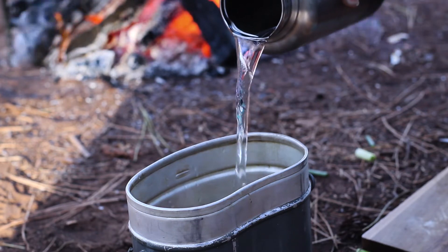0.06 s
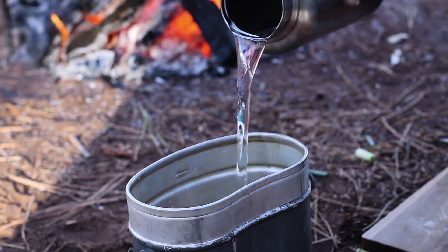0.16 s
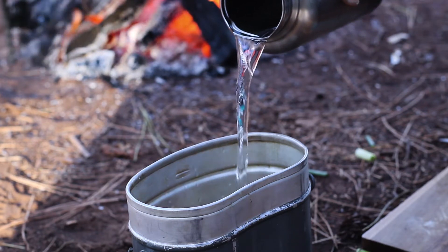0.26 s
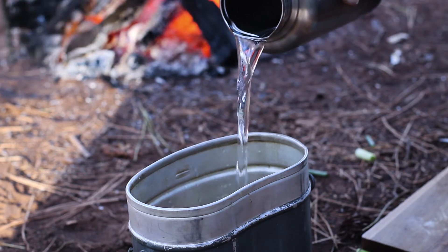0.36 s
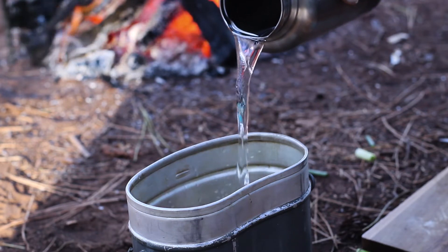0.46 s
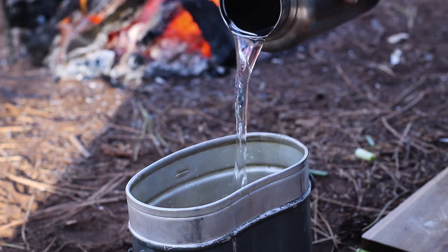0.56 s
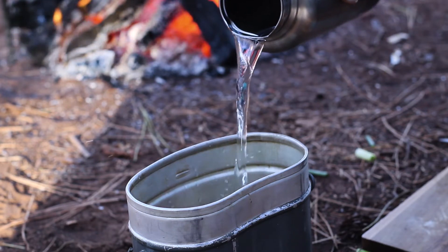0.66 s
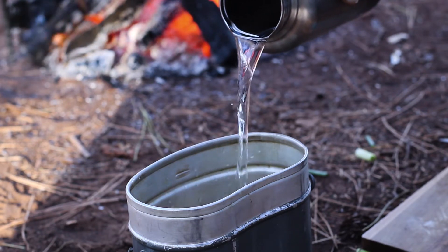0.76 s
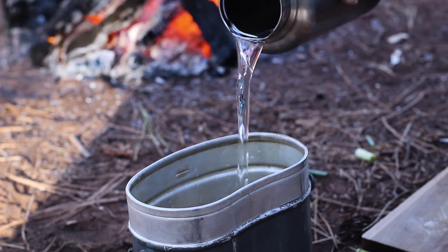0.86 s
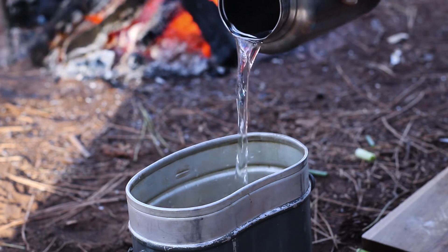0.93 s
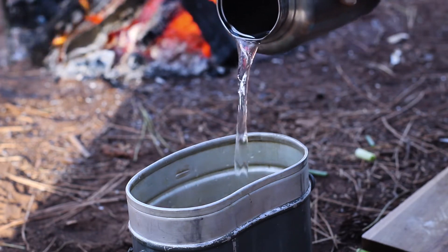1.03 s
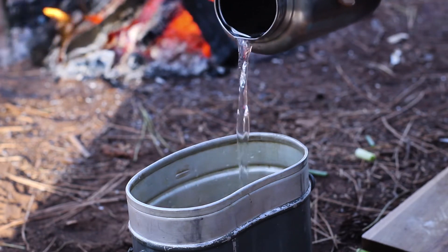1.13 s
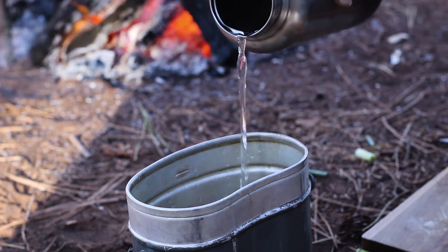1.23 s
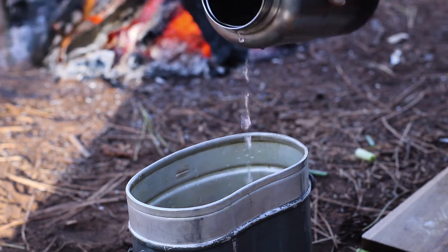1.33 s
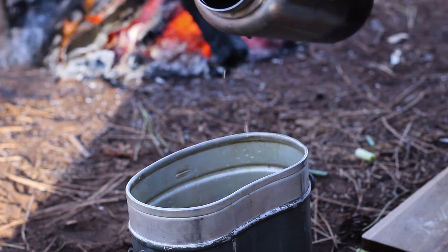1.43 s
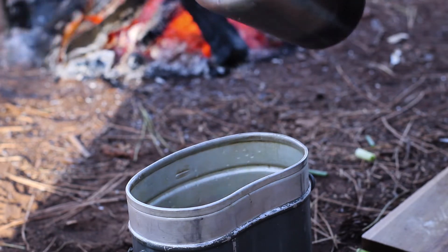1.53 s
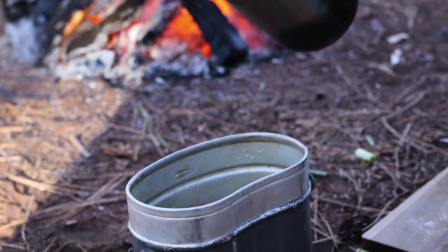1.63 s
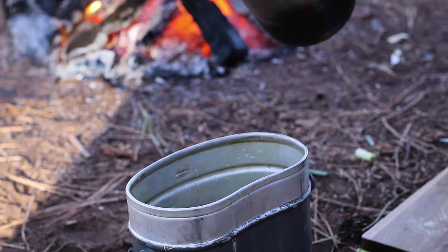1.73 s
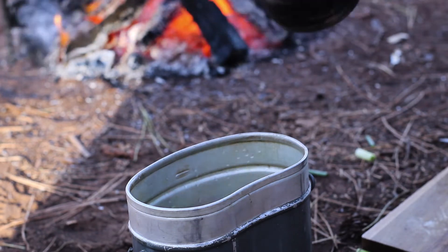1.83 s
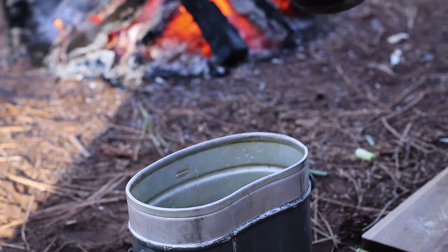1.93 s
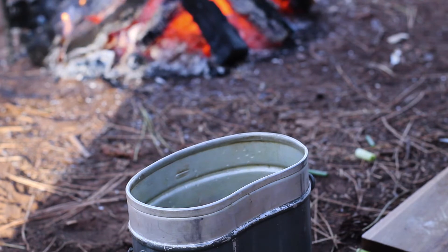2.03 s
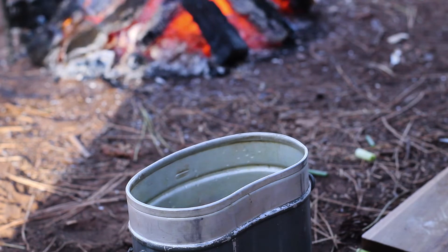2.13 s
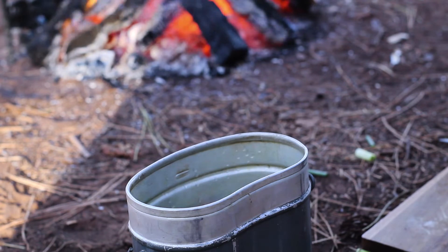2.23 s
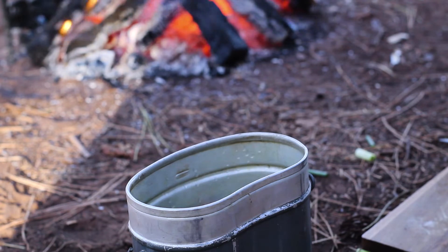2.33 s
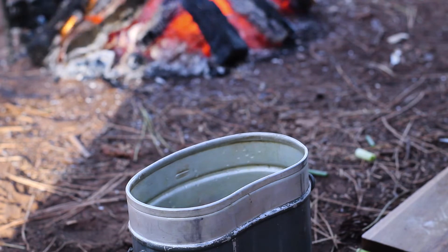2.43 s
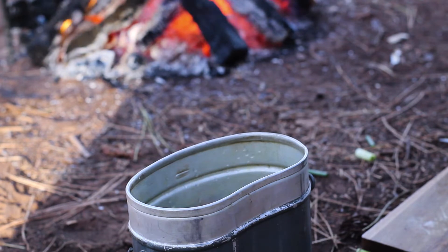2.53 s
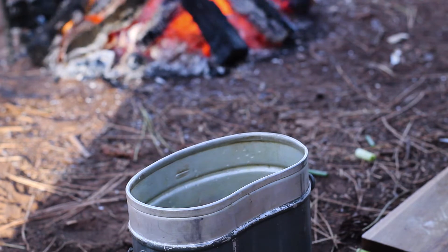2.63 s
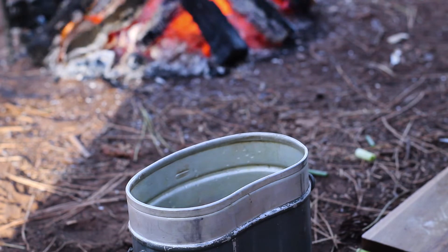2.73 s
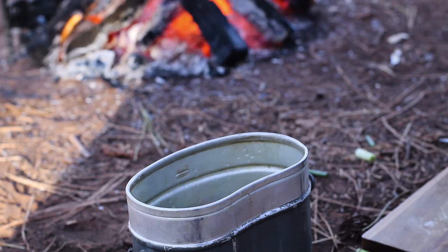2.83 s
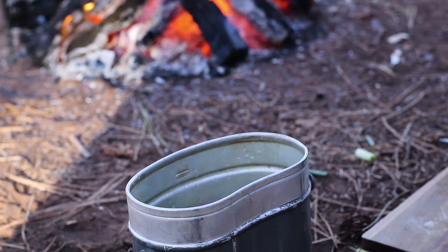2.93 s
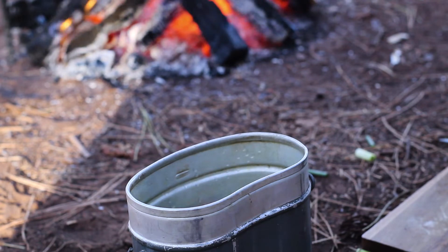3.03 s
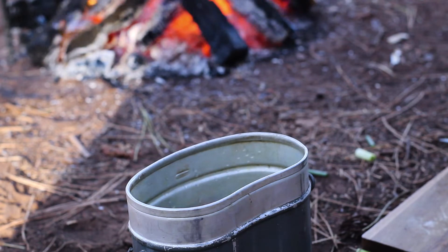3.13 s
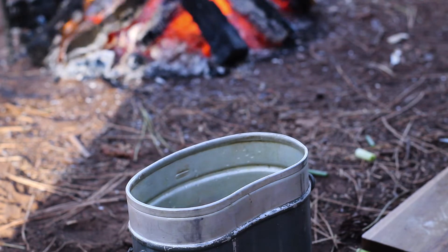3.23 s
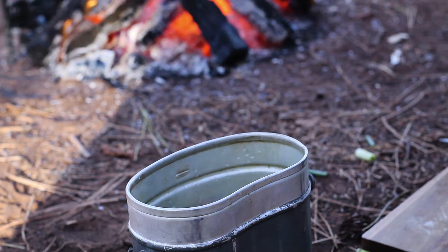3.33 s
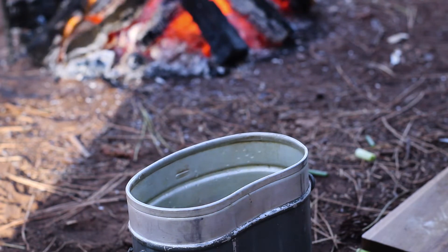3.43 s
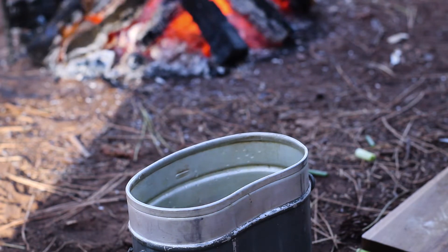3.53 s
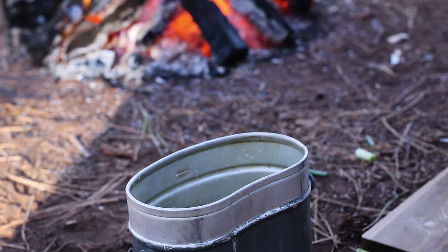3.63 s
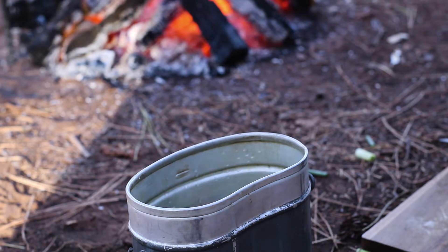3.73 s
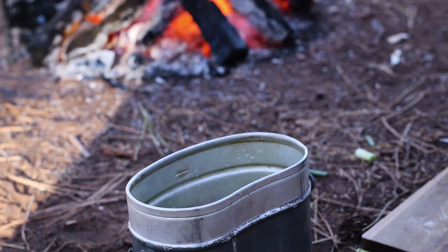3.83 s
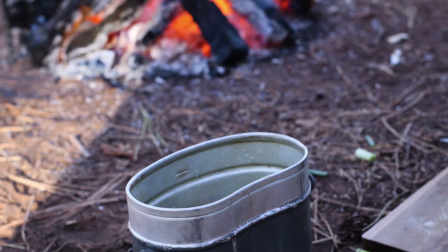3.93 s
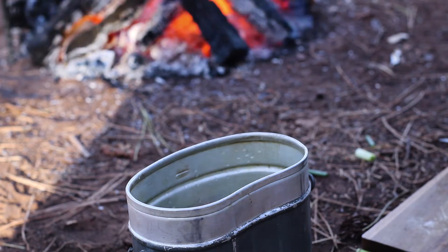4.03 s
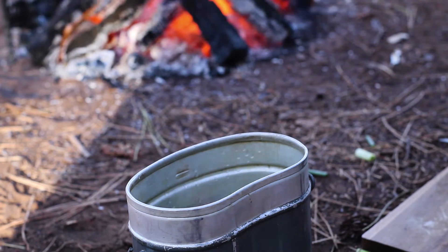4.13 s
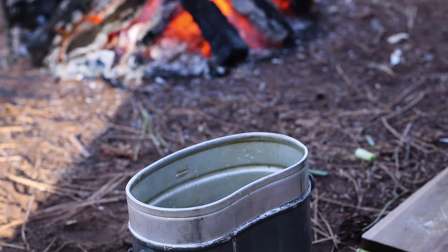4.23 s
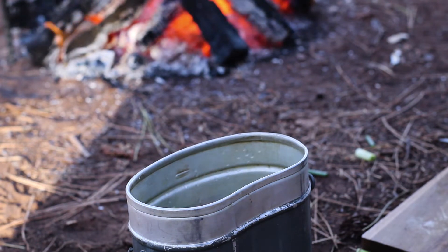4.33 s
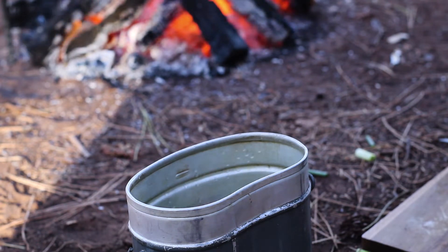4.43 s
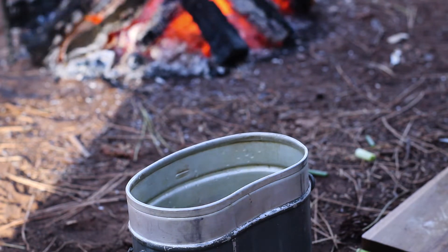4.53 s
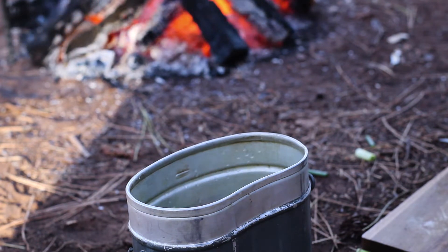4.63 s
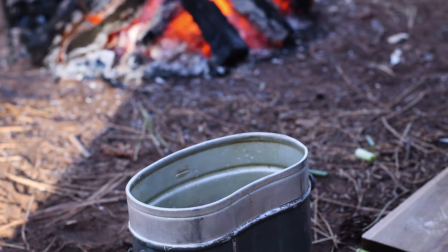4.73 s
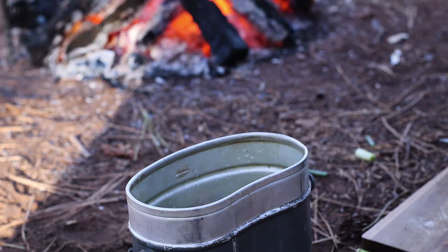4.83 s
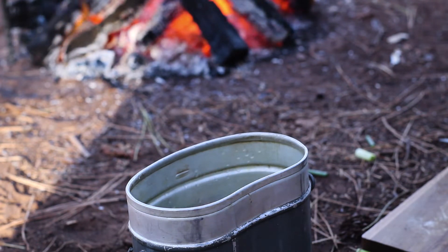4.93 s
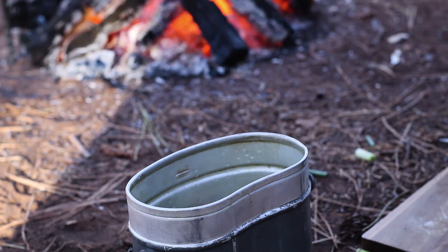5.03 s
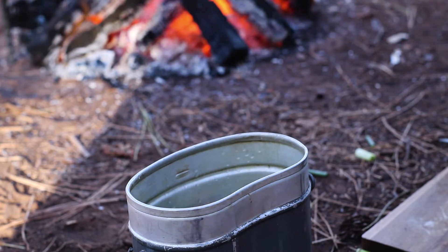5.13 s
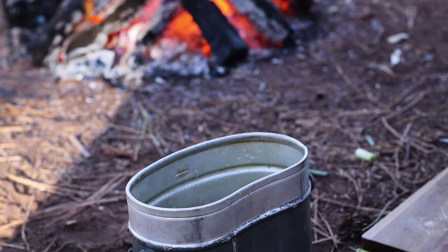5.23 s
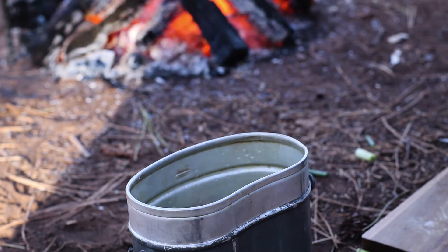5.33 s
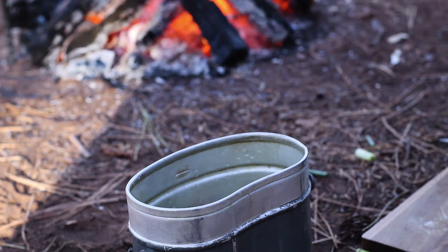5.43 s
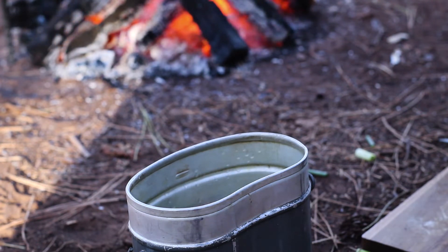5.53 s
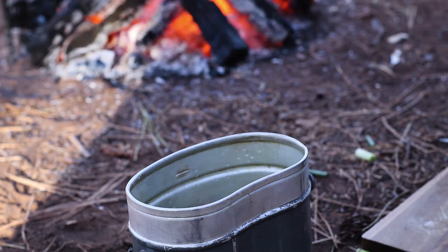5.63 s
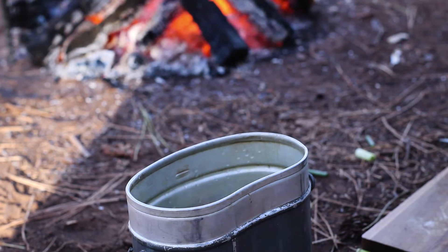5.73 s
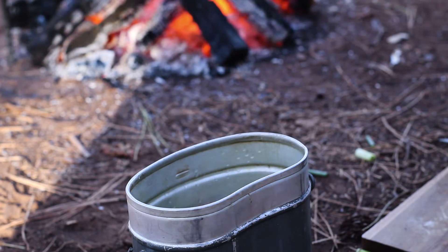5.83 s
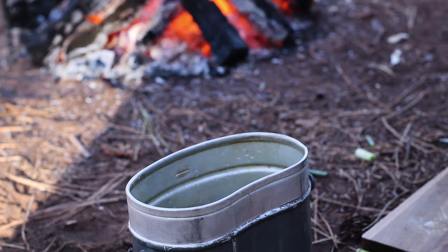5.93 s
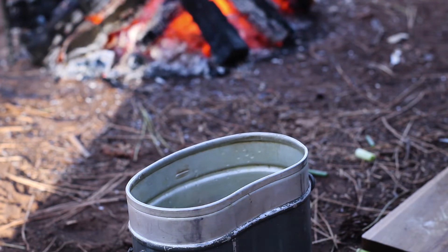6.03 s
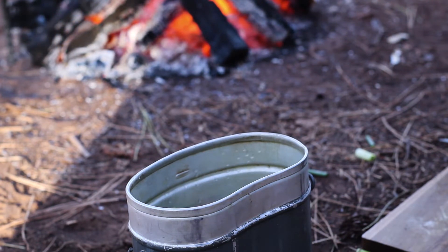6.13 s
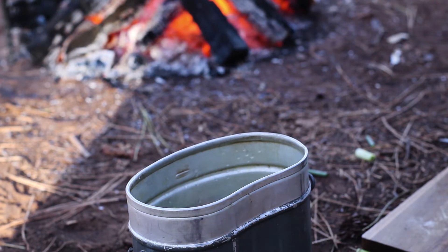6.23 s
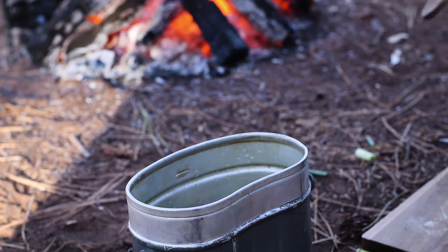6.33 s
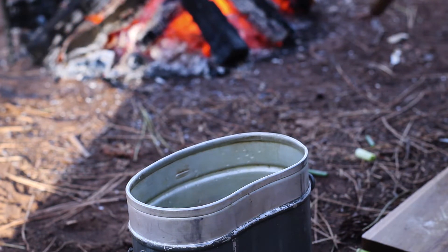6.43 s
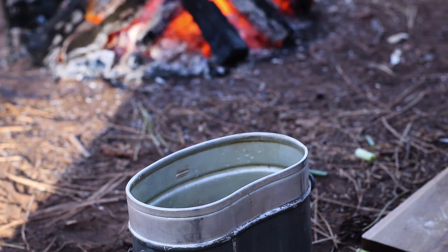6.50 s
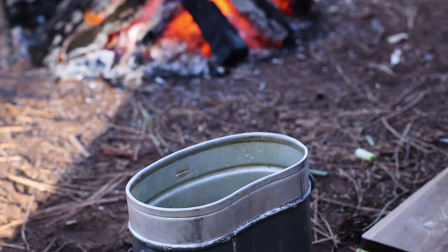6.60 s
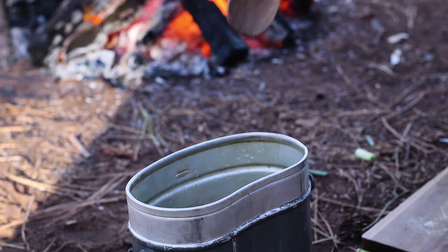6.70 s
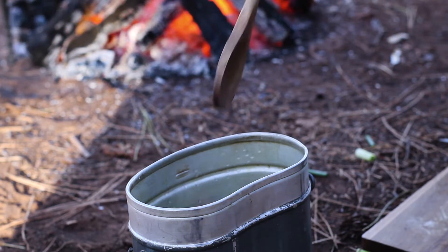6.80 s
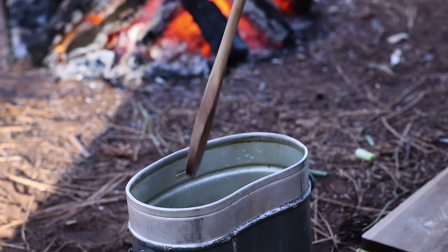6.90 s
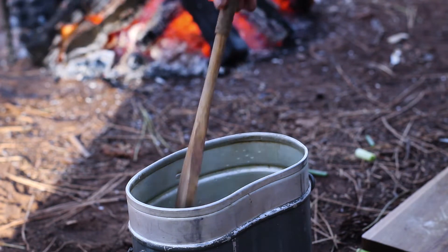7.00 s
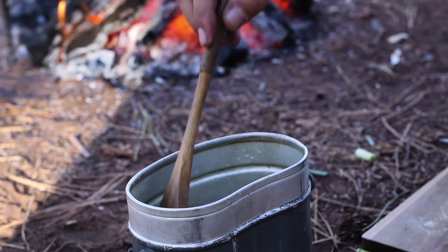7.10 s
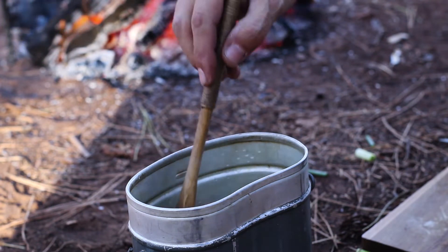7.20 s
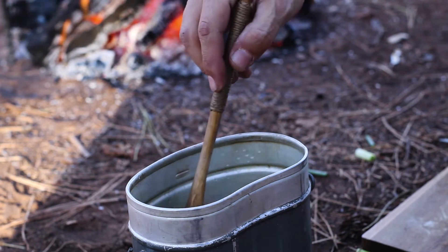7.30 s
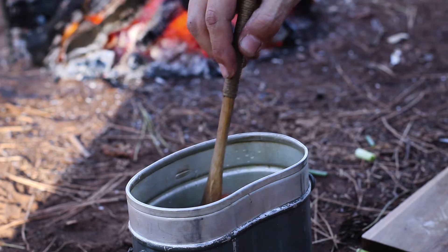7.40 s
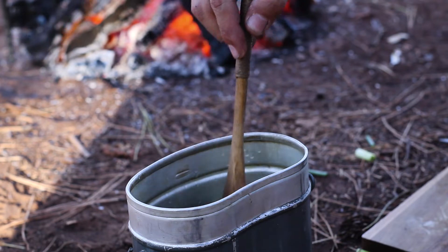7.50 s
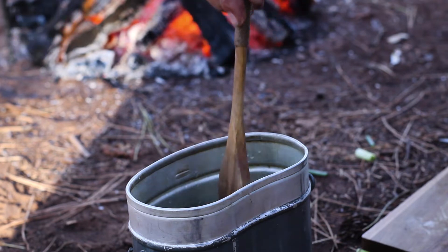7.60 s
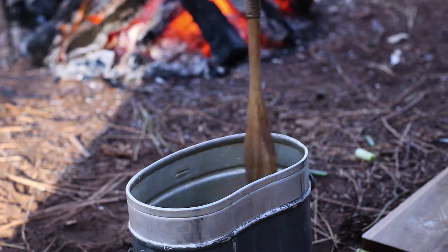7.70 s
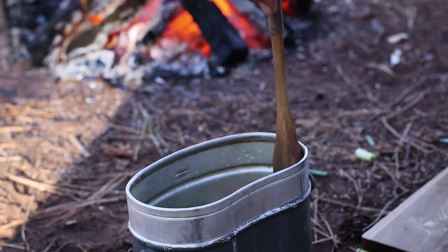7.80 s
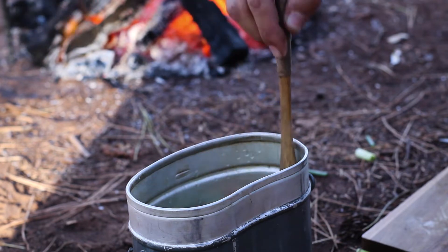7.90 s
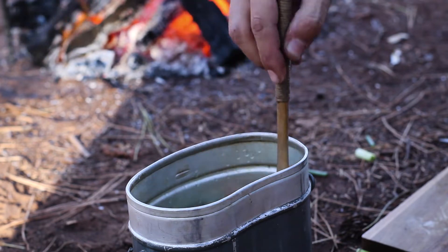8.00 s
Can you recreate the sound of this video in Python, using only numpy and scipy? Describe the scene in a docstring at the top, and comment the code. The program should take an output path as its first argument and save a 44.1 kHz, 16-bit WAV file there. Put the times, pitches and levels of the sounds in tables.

```python
"""Beside a campfire, a pour from a steel bottle into a metal cup ends, the stream breaking into drops.
The bottle is capped and put down with hollow knocks and a squeak; a wooden spoon strikes and scrapes the cup.
Struck metal is sums of decaying modes; stream and scrapes are random grains driving resonators.
The fire is flickering bands of hiss with noise-burst ticks; drops are bursts, bubbles rising sines,
and the faint chirps and whine are narrow bands of noise."""
import sys
import numpy as np
from scipy import signal
from scipy.io import wavfile

SR = 44100
rng = np.random.default_rng(int(sys.argv[2]) if len(sys.argv) > 2 else 0)


def wav_record(signal):
    """Record a signal, one row per channel, as 16-bit PCM in the file named by sys.argv[1]."""
    frames = np.transpose(np.atleast_2d(signal))
    bounded = np.clip(frames, -1, 1)
    # unit amplitude maps onto the largest positive 16-bit level
    quanta = np.round(bounded * 32767).astype(np.int16)
    wavfile.write(sys.argv[1], SR, quanta)


N = 355446


def amp(db):
    """Decibels to a linear gain."""
    return 10 ** (np.asarray(db) / 20)


def rms_one(x):
    """Scales a sound to an rms of 1."""
    return x / np.sqrt(np.mean(x ** 2) + 1e-20)


def drift(rate_hz):
    """Slow random wander with spread 1: noise smoothed by two poles at a reduced sample rate."""
    r = np.exp(-80 * np.pi * rate_hz / SR)
    noise = rng.standard_normal(N // 40 + 2002)
    slow = signal.lfilter([1], [1, -2 * r, r * r], noise)[2000:]   # skips the filter's build-up
    return np.interp(np.arange(N) / 40, np.arange(len(slow)), rms_one(slow))


def ring(clicks, hz, t60_s):
    """A resonator: a unit click sets a decaying sine of height 1 ringing."""
    r, w = amp(-60 / (t60_s * SR)), 2 * np.pi * hz / SR
    return signal.lfilter([0, np.sin(w)], [1, -2 * r * np.cos(w), r * r], clicks + 1e-18)


def grains(per_s, spread_db):
    """Random clicks of very uneven size and either sign."""
    sizes = amp(spread_db * np.minimum(rng.exponential(1, N), 4)) * rng.choice([-1, 1], N)
    return sizes * (rng.random(N) < per_s / SR)


def band(x, low_hz, high_hz):
    """Band-pass filter."""
    return signal.sosfilt(signal.butter(2, [low_hz, min(high_hz, .45 * SR)], "band", fs=SR, output="sos"), x)


def add(out, s, sound):
    """Mixes a short sound in at time s."""
    i = round(s * SR)
    out[i:i + len(sound)] += sound[:N - i]


def decay(t60_s, size):
    """An exponential fade, 60 dB down after t60_s."""
    return amp(-60 * np.arange(size) / SR / t60_s)


def sine(hz, size):
    """A steady sine starting at zero."""
    return np.sin(2 * np.pi * hz * np.arange(size) / SR)


def snap(hz, breadth, t60_s, tail_db, tail_t60_s):
    """A burst of noise around hz that builds for a millisecond, then fades in two slopes; peak 1."""
    fade = decay(t60_s, size=1500) + amp(tail_db) * decay(tail_t60_s, size=1500)
    shape = np.append(np.geomspace(.02, 1, 50), fade)
    wide = 1 + np.clip(breadth, .03, 3)
    burst = band(rng.standard_normal(len(shape)) * shape, hz / wide, hz * wide)
    return burst / np.abs(burst).max()


def gliding(drive, hz, width_hz):
    """Drive limited to width_hz and carried on a moving centre; rms 1."""
    turn = np.exp(2j * np.pi * np.cumsum(hz) / SR)
    low_pass = signal.butter(2, width_hz / 2, fs=SR, output="sos")
    slow = signal.sosfilt(low_pass, drive * np.conj(turn))
    return rms_one(np.real(slow * turn))


def strokes(rows, attack_s, sag_db, release_s):
    """Gain of strokes that rise, sag and stop, and their further columns held until the next stroke."""
    t, rows = np.arange(N) / SR, np.array(rows)
    current = np.maximum(np.searchsorted(rows[:, 0], t) - 1, 0)
    s, length, db, *rest = rows[current].T
    edges = np.clip(np.minimum((t - s) / attack_s, (s + length - t) / release_s), 0, 1)
    return [edges * amp(db + sag_db * np.clip((t - s) / length, 0, 1)), *rest]


# Faint far chirps: start_s, level_db, length_s
CHIRPS = [(3.6, -66, .03), (3.64, -64, .05), (3.78, -64, .04), (3.865, -60, .045), (4.01, -63, .027),
          (4.105, -64, 0.029), (4.181, -64, .02)]
CHIRP_HZ = 5240
WHINE_HZ, WHINE_WIDTH_HZ, WHINE_DB = 13300, 300, -82


def insects():
    """Narrow bands of noise: short rough chirps over a thin wavering whine."""
    air = rng.standard_normal(N)
    out = amp(WHINE_DB + 3.9 * drift(7.4)) * gliding(air, np.full(N, WHINE_HZ), WHINE_WIDTH_HZ)
    tone = gliding(air, np.full(N, CHIRP_HZ), 120)
    for s, db, length in CHIRPS:
        i, size = round(s * SR), round(length * SR)
        out[i:i + size] += amp(db) * np.hanning(size) ** .5 * tone[i:i + size]
    return out


# Tone colour of the fire's hiss: pitch_hz, level_db (relative, per Hz)
HISS = [(12, -40), (20, -14.5), (74, 3), (177, -1.5), (328, 0), (513, -4.5), (1610, -9.5), (5530, -17),
        (10500, -19.5), (13900, -23), (16000, -59)]
# The loudest ticks of the fire: start_s, peak_db, centre_hz, breadth (share of the centre)
TICKS = [(1.516, -37, 10400, 0.45), (1.5284, -37.5, 10700, 0.51), (1.5698, -37, 8940, 0.45),
         (1.73, -40, 6370, 0.4), (2.2273, -38, 4930, 0.45), (2.3527, -36.5, 9740, 0.45),
         (2.5526, -37.5, 9480, 0.45), (2.5795, -41, 8420, 0.45), (2.6334, -39, 11600, 0.45),
         (2.7516, -36, 9220, 0.45), (2.8155, -33.5, 10500, 0.49), (3.5294, -29, 9600, 0.56),
         (3.8422, -31, 9870, 0.37), (3.864, -36.5, 5250, 0.52), (4.1644, -40, 11500, 0.45),
         (4.1774, -39, 5190, 0.45), (4.2244, -35, 11400, 0.45), (4.3323, -39, 4840, 0.49),
         (4.4064, -34, 5010, 0.45), (4.4137, -31, 4500, 0.45), (4.5575, -40, 9030, 0.45),
         (4.6544, -31, 8980, 0.55), (4.7336, -39, 7470, 0.45), (4.9264, -32.5, 8240, 0.45),
         (5.013, -38.5, 7880, 0.35), (5.1018, -34.5, 8200, 0.36), (5.2897, -35.5, 4670, 0.49),
         (5.4066, -25.5, 10600, 0.42), (5.4864, -39.5, 8880, 0.45), (5.5516, -39, 9150, 0.45),
         (5.885, -23, 10400, 0.49), (5.9708, -38, 9410, 0.45), (6.221, -28.5, 10700, 0.45),
         (6.4445, -35.5, 10900, 0.49), (6.6313, -32, 4730, 0.58), (6.9416, -34.5, 6800, 0.59),
         (7.3296, -36, 8400, 0.45), (7.421, -43, 5880, 0.45), (7.5867, -33, 11000, 0.56),
         (7.7273, -35, 9890, 0.45)]
HISS_DB = -55.5


def fire():
    """Half-octave bands of hiss that flicker a little, tiny random crackle, and noise-burst ticks."""
    hiss, together = 0, drift(3.0)
    white, (hz, db) = rng.standard_normal((2, N)), np.transpose(HISS)
    for k, low in enumerate(20 * 2 ** np.arange(0, 10, .5)):
        level_db = np.interp(np.log(low * 2 ** 0.21), np.log(hz), db)
        flicker_db = .5 * together + 1.1 * drift(9)
        hiss = hiss + amp(level_db + flicker_db) * band(white[k % 2], low, low * 2 ** .5)
    hiss = signal.sosfilt(signal.butter(8, 15300, fs=SR, output="sos"), hiss)   # thins out at the very top
    crackle = rms_one(band(grains(90, 2.9), 8860, 10700))
    out = amp(HISS_DB) * (rms_one(hiss) + amp(-15) * crackle)
    for s, peak_db, hz, breadth in TICKS:
        add(out, s, amp(peak_db) * snap(hz, breadth, 0.0023, -12.5, 0.028))
    return out


# Dry rustles: start_s, length_s, level_db, brightness (0-1)
RUSTLES = [(3.96, 0.046, -53, 0.6), (4.18, .06, -53, .8), (4.24, .08, -57, .7), (4.33, 0.056, -57, .5),
           (4.4, 0.093, -49.5, .6), (5.238, 0.029, -46, 0.5), (5.92, .045, -59, 0.8)]


def rustles():
    """Uneven rubbing grains, balanced between a bright and a dull band."""
    level, bright = strokes(RUSTLES, 0.0075, -2.5, 0.011)
    bright = np.clip(bright, 0, 1)
    rub = grains(2500 * amp(5.5 * drift(50)), 3.5)
    crisp, dull = rms_one(band(rub, 7900, 12200)), rms_one(band(rub, 340, 4900))
    return level * (np.sqrt(bright) * crisp + np.sqrt(1 - bright) * dull)


# A short dry creak: start_s, length_s, level_db
CREAK = (6.003, .06, -55)
# Its resonances: pitch_hz, width_hz (sets the decay), level_db
CREAK_MODES = [(566, 76, -5), (770, 98, -2.5), (1290, 290, -4), (4000, 1000, -4.5), (9400, 450, -4)]


def creak():
    """Random slips set a few broad resonances ringing."""
    slips = grains(1400, 4.5)
    body = sum(amp(db) * rms_one(ring(slips, hz, 2.6 / width)) for hz, width, db in CREAK_MODES)
    return strokes([CREAK], .005, -3, .005)[0] * body


# Dull bumps: start_s, level_db, pitch_hz, t60_s
THUMPS = [(4.177, -39.5, 230, .042), (5.254, -22.5, 170, .024), (5.258, -35, 91, .12),
          (7.279, -37, 850, .016)]
THUMP_RISE_S = .001


def thumps():
    """Damped low sines with a softened start."""
    out = np.zeros(N)
    for s, db, hz, t60 in THUMPS:
        rise = 1 - decay(7 * THUMP_RISE_S, size=6000)
        add(out, s, amp(db) * decay(t60, size=6000) * rise * sine(hz, size=6000))
    return out


# Squeak of escaping air: start_s, length_s, level_db
SQUEAK = (4.4, 0.0905, -41.5)
# Its falling pitch before flutter, gliding from point to point: time_s, pitch_hz
SQUEAK_PITCH = [(4.4, 6800), (4.42, 4730), (4.448, 3400), (4.466, 3100), (4.488, 1400)]


def squeak():
    """Escaping air: grainy noise in a falling, fluttering band and its octave."""
    level, = strokes([SQUEAK], .02, -2.2, 0.013)
    hz = np.interp(np.arange(N) / SR, *np.transpose(SQUEAK_PITCH))
    hz = hz * (1 + 0.04 * drift(55))   # the gap flutters
    air = grains(7600, 2.8)
    return level * (gliding(air, hz, 520) + amp(-8.5) * gliding(air, 2 * hz, 1500))


# Spoon blows on the cup wall: start_s, ring_db (drive into the modes), crack_db
SPOON = [(7.1506, -49, -22.5), (7.8734, -24, -19)]
# Spoon dragging on the wall: start_s, length_s, level_db, centre_hz (before wobble)
DRAG = [(7.885, 0.096, -41, 1820), (8.03, .05, -53.5, 2100)]
# Modes of the struck cup: pitch_hz, level_db, t60_s
CUP_STRUCK = [(390, -16.5, 0.046), (577, -13, 0.039), (847, -10.5, 0.064), (1170, -2, 0.014),
              (1570, -2, 0.03), (1790, -4, 0.027), (2250, -1, 0.017), (2570, -1.5, 0.022),
              (3080, 2.5, 0.014), (3520, -4.5, 0.035), (3776, 0, 0.024), (4450, -2.5, 0.014),
              (5170, -7, .02), (6200, -12, .02), (7100, -12, 0.022)]
CONTACT_CUT_HZ = 5000
REBOUND_S, REBOUND_DB = 0.001077, -10.5


def spoon():
    """Blows that rebound once into the cup's modes, then stick-slip grains along the wall."""
    out, blows = np.zeros(N), np.zeros(N)
    for s, ring_db, crack_db in SPOON:
        # wood is a soft contact: the push fades instead of clicking
        touch = amp(ring_db) * np.exp(-2 * np.pi * CONTACT_CUT_HZ * np.arange(200) / SR)
        add(blows, s, touch)
        add(blows, s + REBOUND_S, amp(REBOUND_DB) * touch)
        add(out, s - .001, amp(crack_db) * snap(6800, 1.2, 0.0045, -17, 0.05))
    out += sum(amp(db) * (-1) ** k * ring(blows, hz, t60) for k, (hz, db, t60) in enumerate(CUP_STRUCK))
    level, hz = strokes(DRAG, 0.01, -6.5, .015)
    slips = grains(5000 * amp(3.5 * drift(80)), 3.0)
    wall = rms_one(sum(amp(db) * ring(slips * rng.standard_normal(N), mode_hz, t60)
                       for mode_hz, db, t60 in CUP_STRUCK))
    scrape = gliding(slips, hz * (1 + .05 * drift(20)), 430)
    return out + level * (scrape + amp(-6) * wall + amp(-12.5) * rms_one(band(slips, 6700, 12000)))


# Bottle modes besides ring and thud: pitch_hz, level_db (within family), t60_s (free),
# family (0 with the ring, 2 crack, 3 with the thud; 2.5 joins the crack in knocks only)
BOTTLE = [(320.5, -10.5, 0.13, 3), (448, -12, 0.2, 3), (664, -8, 0.043, 3), (932, -8.5, 0.42, 2),
          (1000, -6, 0.04, 2.5), (830, 0, 0.024, 2), (1466, -8, 0.048, 0), (3120, -4.5, 0.059, 2),
          (3540, -3.5, 0.04, 2), (4040, -3, 0.047, 2), (4600, -7.5, 0.071, 2), (5630, -6, 0.034, 2),
          (6810, -5.5, 0.044, 2), (12600, -7.5, 0.027, 2)]
# Knocks on the bottle: start_s, ring_db, ring_hz, thud_hz, thud_db, body_db (dull noise burst),
# crack_db, sustain (share of the free t60)
KNOCKS = [(2.9499, -37, 1807, 374, -34, -34, -56, 0.95), (2.9549, -27, 1750, 366, -30, -34, -51, 1),
          (3.029, -25, 1750, 297, -36.5, -36, -39, 1), (3.051, -30, 1750, 301, -36, -37, -41.5, 0.88),
          (3.078, -45, 1750, 222, -52, -42, -50, .9), (3.1095, -35, 1750, 208, -36, -30.5, -37.5, 0.64),
          (3.1207, -28.5, 1830, 191, -57, -29.5, -44, 0.51), (3.1862, -40, 1720, 178, -40, -30, -52, 1),
          (3.2055, -15, 1730, 211, -35.5, -22.5, -33.5, 0.62), (3.3909, -48, 1865, 214, -63, -41, -53, 1),
          (3.6868, -32, 1762, 376, -46, -55, -50, 0.52), (3.738, -35, 1790, 206.5, -39.5, -32, -42.5, 0.69),
          (3.77, -43, 1804, 195, -46, -34, -55, .83), (3.7903, -37, 1780, 216, -54, -44, -44.5, 0.56),
          (3.9172, -32, 1820, 373, -38, -29, -48, .32), (3.9239, -20, 1816, 180, -43, -21, -33.5, .42),
          (3.93, -20, 1840, 353, -32, -26, -59, .3), (3.9846, -37, 1990, 373, -53, -25, -52, .4)]
THUD_T60_S, RING_T60_S = 0.16, 0.11   # free, before the grip damps them
KNOCK_RISE_S = .0012


def bottle_knocks():
    """Knocks set the bottle's modes ringing; the grip shifts the ring and thud and damps the modes."""
    out, t = np.zeros(N), np.arange(9000) / SR
    for s, ring_db, ring_hz, thud_hz, thud_db, body_db, crack_db, sustain in KNOCKS:
        family_db = {0: ring_db, 2: crack_db, 3: thud_db}
        modes = [(thud_hz, thud_db, THUD_T60_S), (ring_hz, ring_db, RING_T60_S)]
        spot_db = rng.normal(0, 1.5, len(BOTTLE))   # each knock balances the modes anew
        modes += [(hz, family_db[round(family)] + db + d, t60)
                  for (hz, db, t60, family), d in zip(BOTTLE, spot_db)]
        sound = sum(amp(db) * decay(t60 * sustain, size=9000) * sine(hz, size=9000)
                    for hz, db, t60 in modes)
        add(out, s, sound * (1 - np.exp(-t / KNOCK_RISE_S)))
        add(out, s, amp(crack_db + 2) * snap(4460, 0.98, 0.019, 10, 0.047))
        add(out, s, amp(body_db - 1.5) * snap(524, 1.63, 0.036, -30, .03))   # dull body of the blow
    return out


# Turns of the cap: start_s, length_s, level_db, ring_hz, high_db (high modes against the ring)
CAP = [(2.95, .1, -49.5, 1745, -9), (3.05, 0.11, -50, 1785, -3), (3.185, 0.072, -50, 1760, -12),
       (3.265, .12, -58.5, 1770, -1), (3.385, 0.097, -55.5, 1830, 2), (3.68, 0.17, -52, 1800, -0.5),
       (3.91, .075, -52, 1840, -8), (3.985, .08, -58, 1980, -10)]


def cap():
    """The cap grinds on its thread: slips excite a narrow band at the ring, high modes and bright hiss."""
    level, ring_hz, high_db = strokes(CAP, 0.014, -5.5, 0.032)
    slips = grains(2500 * amp(3.7 * drift(40)), 3.1)
    high = rms_one(sum(amp(db) * ring(slips * rng.standard_normal(N), hz, 0.45 * t60)
                       for hz, db, t60, family in BOTTLE if family == 2))
    high = high + amp(-1) * rms_one(band(slips, 2400, 10200))
    return level * (gliding(slips, ring_hz, 110) + amp(high_db) * high)


# The stream thinning and breaking up, before surges: time_s, spray_db, cup_db (ringing and gurgle)
STREAM = [(0, -50, -60), (.2, -55, -64), (.3, -53, -57), (.6, -56.5, -64), (.86, -54, -58.5),
          (1.09, -51.5, -56.5), (1.14, -62, -58), (1.19, -69, -60), (1.32, -63, -58), (1.39, -52, -55),
          (1.47, -53, -62), (1.52, -70, -75)]
# Modes of the filled cup: pitch_hz, width_hz (sets the decay), level_db
CUP = [(898, 52, 9), (1586, 110, 9), (2610, 280, -2), (3580, 44, -14), (4040, 49, -11), (4500, 81, -25),
       (5470, 240, -15), (6660, 83, -27)]
STREAM_END_S = STREAM[-1][0]
UPPER_MODES_DB, SURGE_DB = -4, 2   # upper modes against the low ones; unsteadiness of the flow


def stream():
    """Tiny ringing bursts and soft spray, over the cup ringing and gurgling under the patter."""
    t = np.arange(N) / SR
    s, spray_db, cup_db = np.transpose(STREAM)
    # each click is dealt to one of 20 pitches
    dealt, clicks, spray = rng.integers(0, 20, N), grains(2200 * amp(3.5 * drift(30)), 4.0), 0
    for k, hz in enumerate(np.geomspace(2500, 13500, 20)):
        burst = ring(ring(clicks * (dealt == k), hz, 20.0 / hz), hz, 30.0 / hz)   # soft start, clear pitch
        spray = spray + rms_one(burst) * amp(-4.0 * abs(np.log2(hz / 9500)))
    soft = rms_one(band(rng.standard_normal(N), 7100, 10900))
    spray = rms_one(spray) + amp(-9.5 + 4.7 * drift(40)) * soft

    patter = grains(2500 * amp(4.4 * drift(28)), 4.1)
    modes = [amp(db + 3.0 * drift(7)) * rms_one(ring(patter * rng.standard_normal(N), hz, 1.6 / width))
             for hz, width, db in CUP]
    dealt, plinks = rng.integers(0, 10, N), grains(120, 5.2)
    gurgle = sum(ring(ring(plinks * (dealt == k), hz, 6.0 / hz), hz, 33.0 / hz) * hz   # large bubbles
                 for k, hz in enumerate(np.geomspace(800, 2100, 10)))
    cup = rms_one(sum(modes[:2])) + amp(-2) * rms_one(gurgle)
    cup = cup + amp(UPPER_MODES_DB) * rms_one(sum(modes[2:]))

    out = amp(np.interp(t, s, spray_db)) * rms_one(spray) + amp(np.interp(t, s, cup_db)) * cup
    return out * (t < STREAM_END_S) * amp(SURGE_DB * drift(8))


# Slugs of water hitting the cup: start_s, level_db, hardest_mode (0 low, 1 second, 2 upper)
SLUGS = [(.014, -45.5, 0), (.073, -44, 0), (.135, -40, 2), (.276, -43, 0), (.4, -44, 0), (.418, -44, 0),
         (.496, -43.5, 1), (.557, -47, 2), (.636, -43, 1), (.76, -48, 0), (.853, -50, 0), (.901, -44, 2),
         (.935, -49, 0), (1.001, -45, 0), (1.09, -39.5, 1), (1.154, -44.5, 0), (1.245, -37.5, 1),
         (1.287, -37, 1), (1.31, -42, 1), (1.334, -45, 0), (1.37, -38, 1), (1.383, -34, 1), (1.401, -44, 0),
         (1.461, -42, 1), (1.478, -36, 2)]
OTHER_MODES_DB = -13.5   # modes a slug does not hit hardest


def slugs():
    """Each slug of water is one blow to all the cup's modes, one group hit hardest."""
    out = np.zeros(N)
    s, level_db, hardest = np.array(SLUGS).T
    for k, (hz, width, db) in enumerate(CUP):
        blows, missed = np.zeros(N), np.round(hardest) != min(k, 2)
        mode_db = (k > 2) * db   # only modes above the third keep their own level
        blows[np.round(s * SR).astype(int)] = amp(level_db + missed * OTHER_MODES_DB + mode_db)
        out += ring(blows, hz, 3.3 / width)
    return out


# The loudest drops bursting: start_s, peak_db, centre_hz
DROPS = [(.0054, -30, 6850), (.016, -37, 5100), (.0285, -29, 12000), (.117, -29, 9540), (.183, -33, 11300),
         (.271, -34, 8700), (.2966, -35, 9210), (.3151, -32, 9700), (.321, -36, 7440), (.3745, -35, 8900),
         (.384, -37, 10800), (.432, -35, 9000), (.456, -35, 10700), (.5336, -31.5, 10000),
         (.551, -37, 7960), (.59, -32, 8400), (.605, -29, 9600), (0.6534, -35.5, 9300), (.751, -37, 9490),
         (0.846, -29.5, 8160), (.8762, -31, 8800), (.9471, -40, 8750), (.9614, -39, 9770),
         (1.0022, -31.5, 9400), (1.0184, -36, 9540), (1.0944, -35, 10000), (1.239, -32, 5600),
         (1.245, -34.5, 6450), (1.2769, -41, 5270), (1.2978, -40, 5470), (1.3113, -35, 7680),
         (1.3304, -33, 9500), (1.355, -37, 7000), (1.3682, -36, 6500), (1.3943, -35, 4630),
         (1.4028, -15.5, 9200), (1.417, -27, 8260), (1.4257, -17, 8100), (1.4282, -10, 10500),
         (1.4447, -18, 10900), (1.4488, -22, 9900), (1.4537, -31, 6940), (1.464, -30, 4000),
         (1.467, -18, 8450), (1.478, -23.5, 6600), (1.4836, -31, 5170), (1.493, -36, 5600)]
SMALL_DROPS_PER_S, SMALL_DROP_MAX_DB = 22, -42


def drops():
    """Single drops burst as short bands of noise, with small ones scattered at random."""
    out = np.zeros(N)
    chances = rng.random((60, 3))[:round(SMALL_DROPS_PER_S * STREAM_END_S)]
    small = [(when * STREAM_END_S, SMALL_DROP_MAX_DB - 6 * weak, 4000 * 2.7 ** pitch)
             for when, weak, pitch in chances]
    for s, peak_db, hz in DROPS + small:
        add(out, s, amp(peak_db) * snap(hz, 0.21, 0.0032, -11.5, 0.019))
    return out


# Bubbles that stand out: start_s, peak_db, pitch_hz (at the start)
BUBBLES = [(.0254, -42, 4080), (0.301, -37.5, 2570), (.5182, -41, 3540), (0.5939, -32, 3180),
           (.6315, -44, 3570), (.8944, -44, 2840), (.9114, -41, 2240), (1.136, -42, 4600),
           (1.241, -42, 5550), (1.29, -41, 2230), (1.4037, -42, 4870), (1.426, -42, 5560),
           (1.4684, -36, 5400)]
BUBBLE_T60_S, BUBBLE_RISE_PER_S = 0.021, 2.2   # rise as a share of the starting pitch


def bubbles():
    """A bubble is a decaying sine whose pitch rises as it nears the surface."""
    out = np.zeros(N)
    for s, peak_db, hz in BUBBLES:
        pitch = hz * (1 + BUBBLE_RISE_PER_S * np.arange(2000) / SR)
        tone = np.sin(2 * np.pi * np.cumsum(pitch) / SR)
        add(out, s, amp(peak_db) * decay(BUBBLE_T60_S, size=2000) * tone)
    return out


def scene():
    """All layers, from the background to the pour, in one channel."""
    background = insects() + fire()
    handling = rustles() + creak() + thumps() + squeak()
    metal = spoon() + bottle_knocks() + cap()
    pour = stream() + slugs() + drops() + bubbles()
    return (background + handling + metal + pour)[None]


CUTOFF_HZ = 16700   # 60 dB down from here up


def record(dry):
    """The microphone rolls off the deep bass; the top is cut."""
    dry = signal.sosfilt(signal.butter(1, 25, "high", fs=SR, output="sos"), dry)
    return signal.sosfilt(signal.cheby2(12, 60, CUTOFF_HZ, fs=SR, output="sos"), dry)


dry = scene()
out = record(dry)
wav_record(out)
```